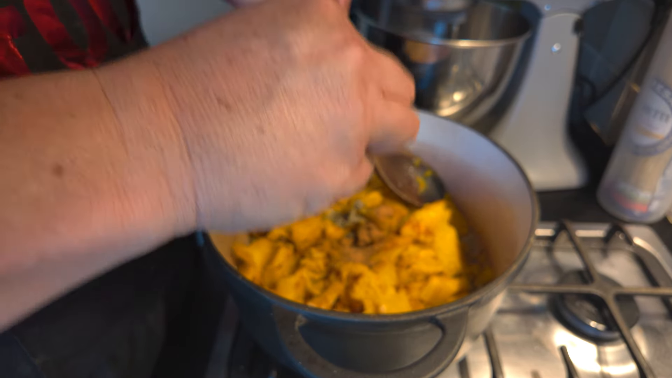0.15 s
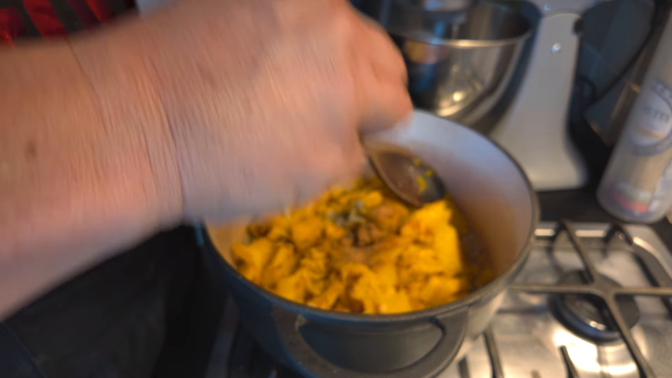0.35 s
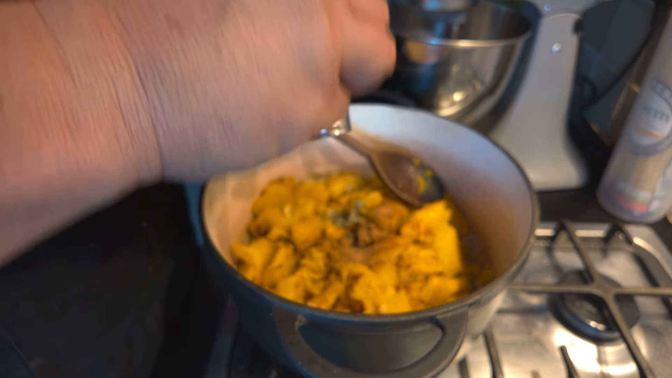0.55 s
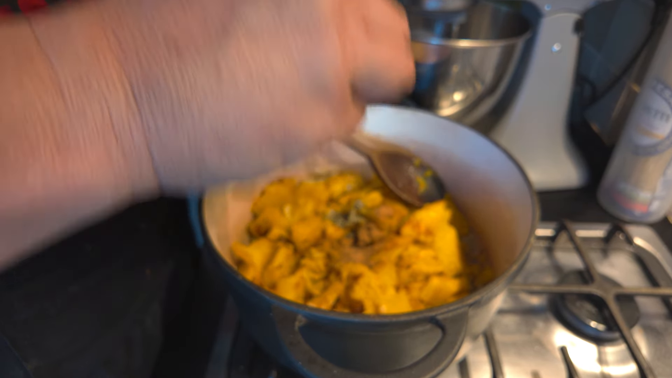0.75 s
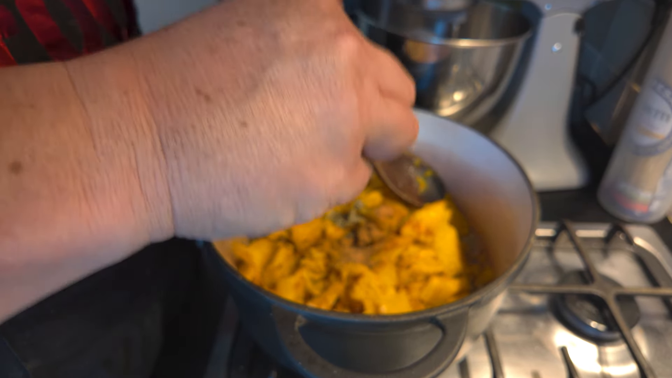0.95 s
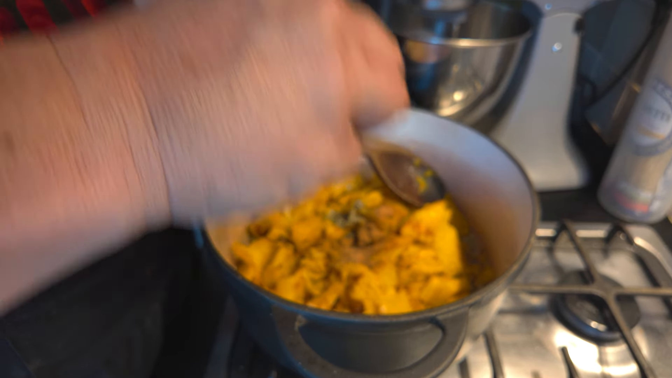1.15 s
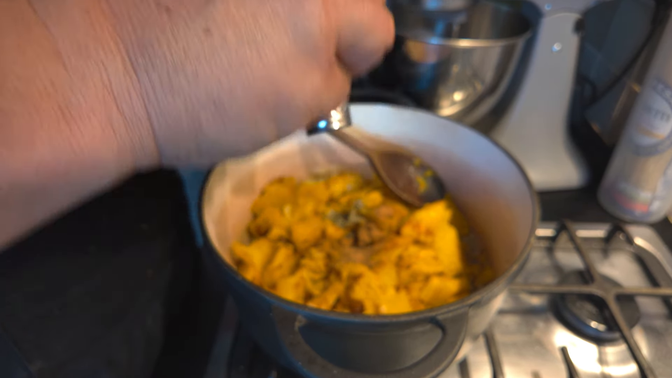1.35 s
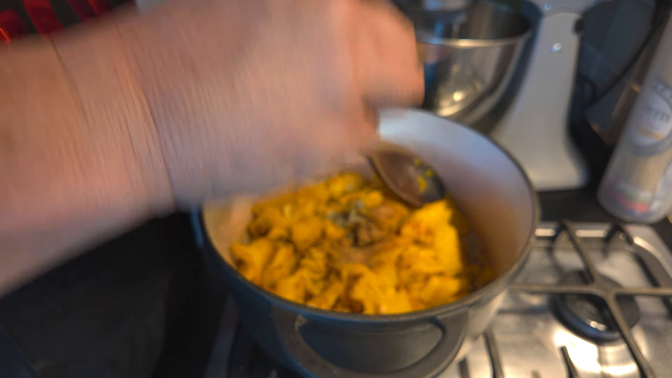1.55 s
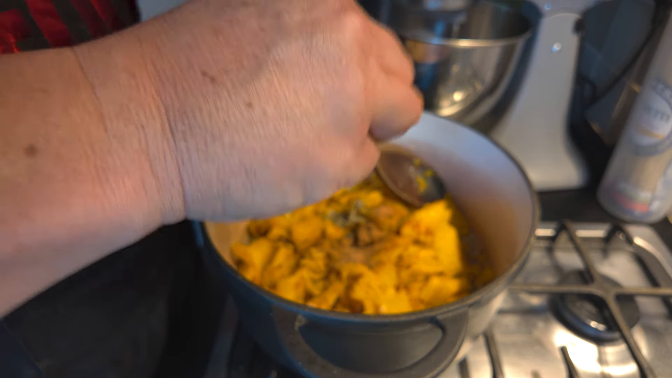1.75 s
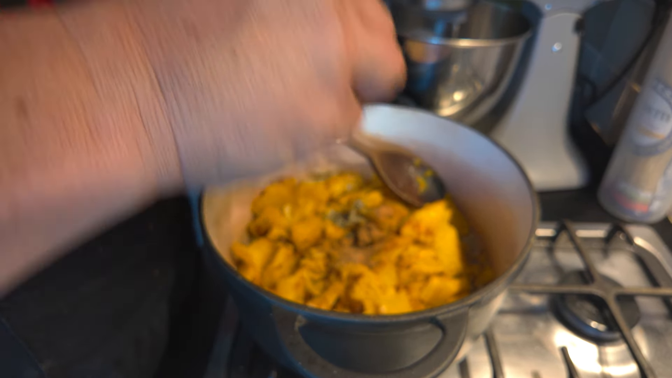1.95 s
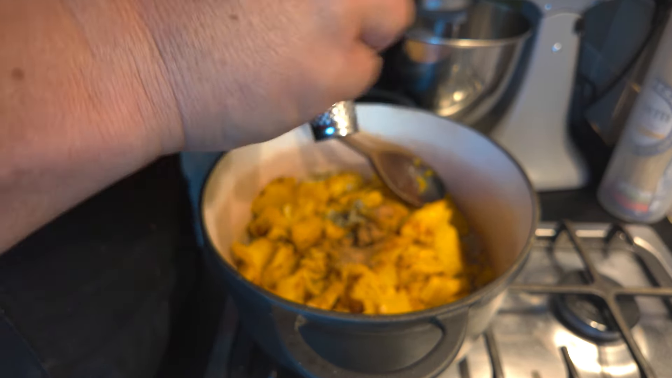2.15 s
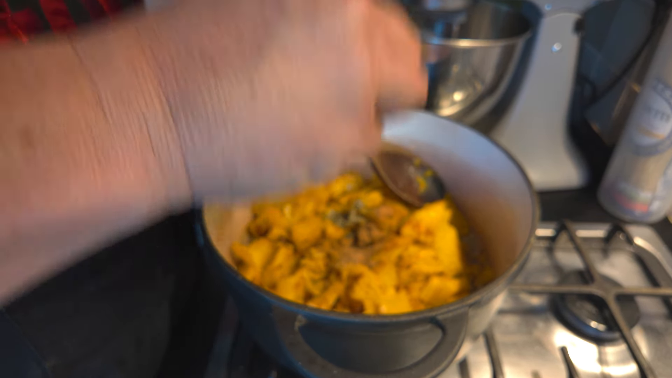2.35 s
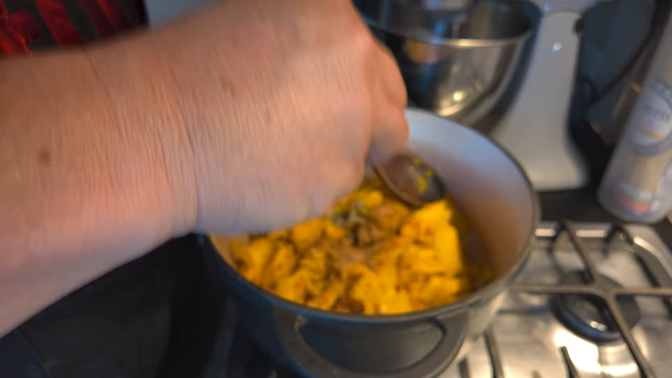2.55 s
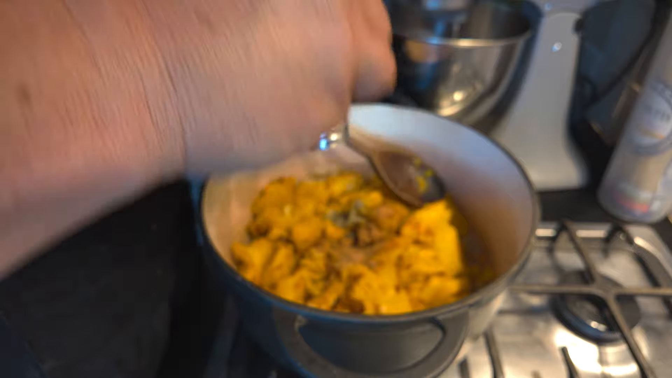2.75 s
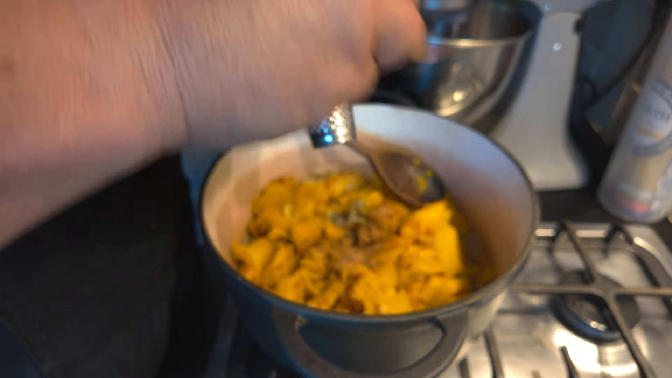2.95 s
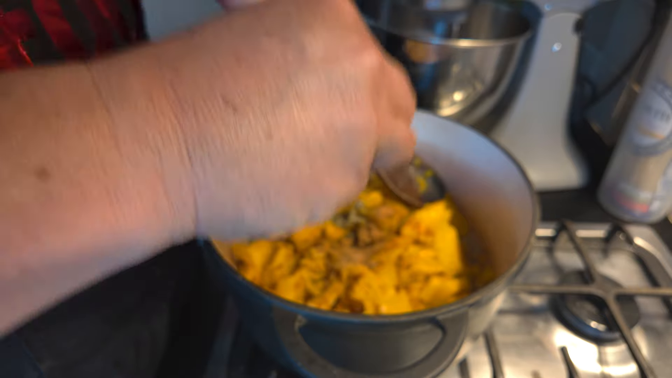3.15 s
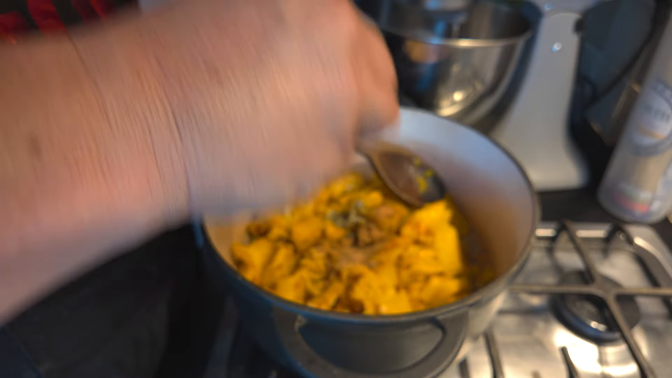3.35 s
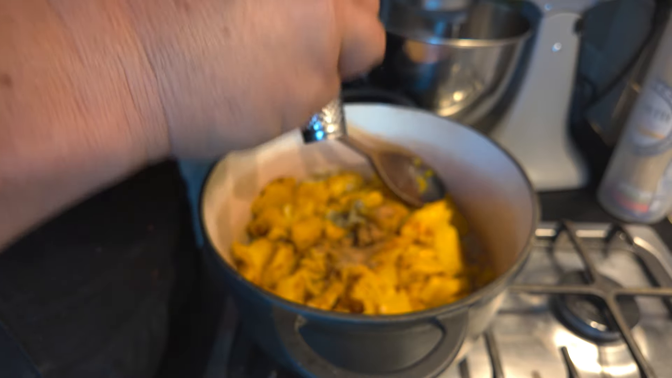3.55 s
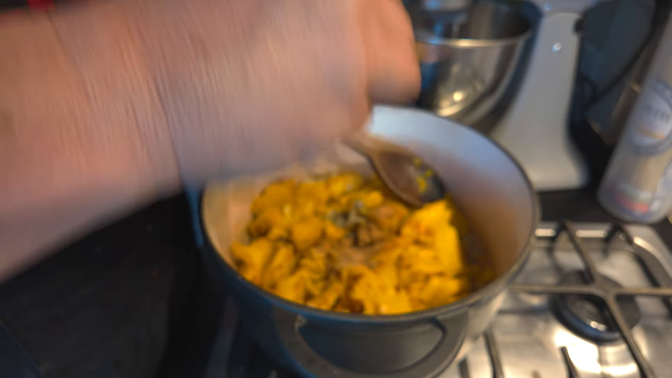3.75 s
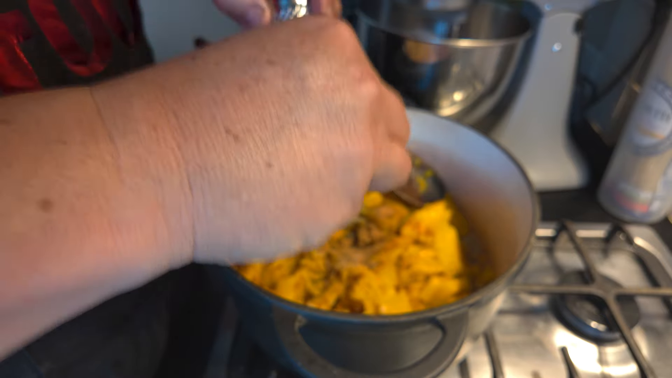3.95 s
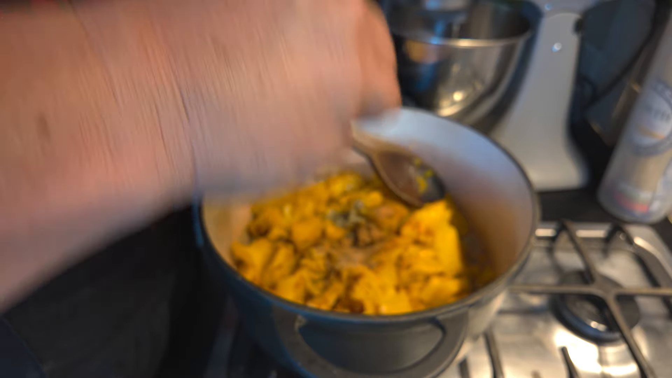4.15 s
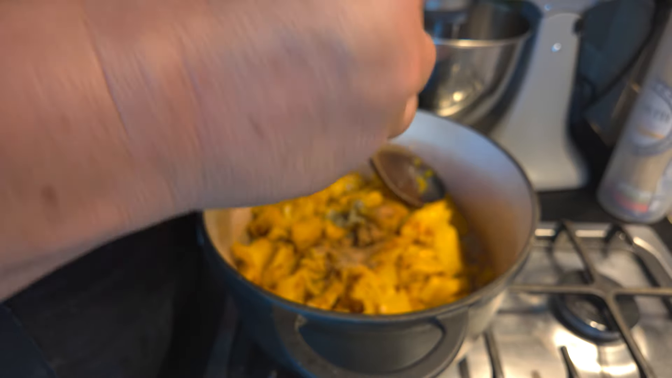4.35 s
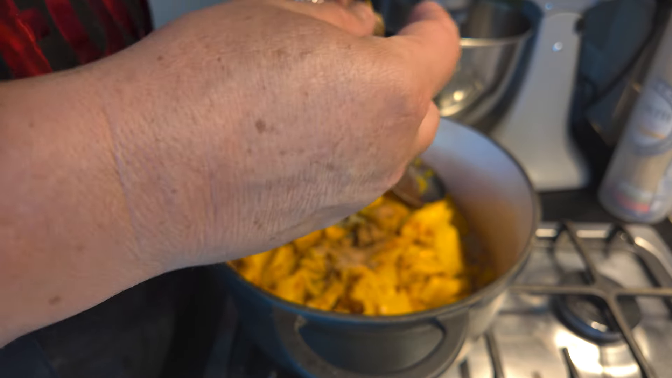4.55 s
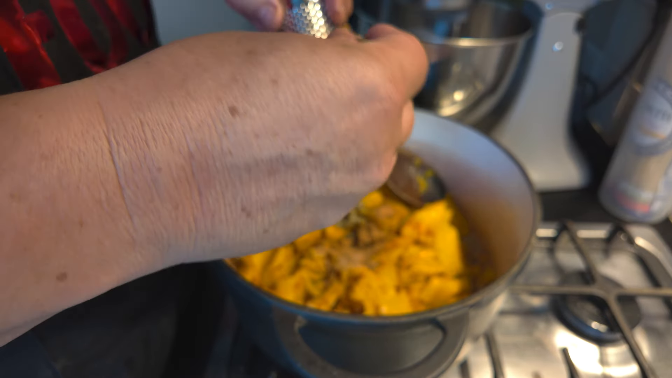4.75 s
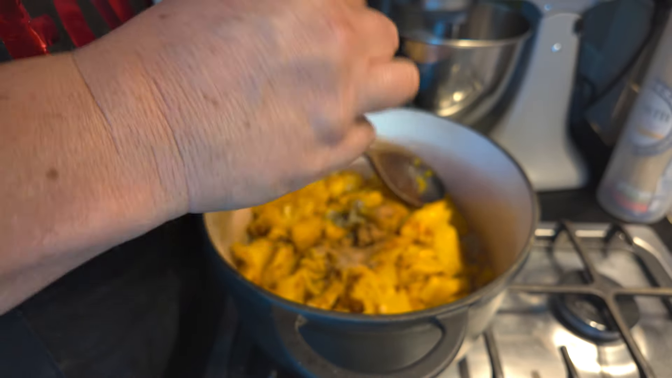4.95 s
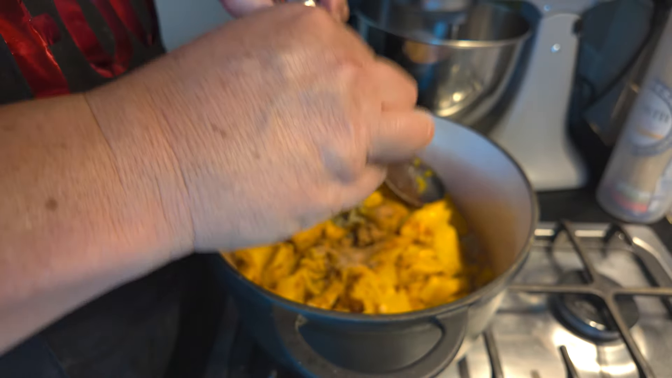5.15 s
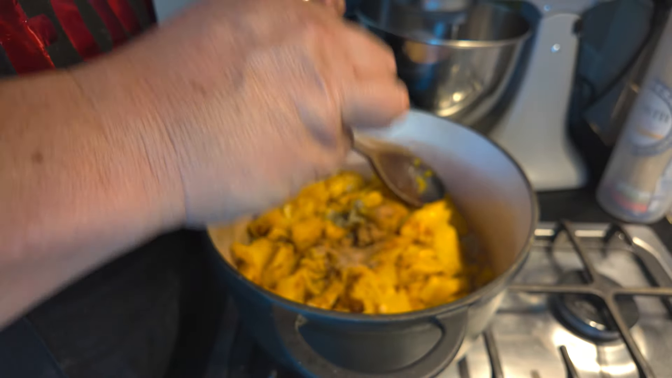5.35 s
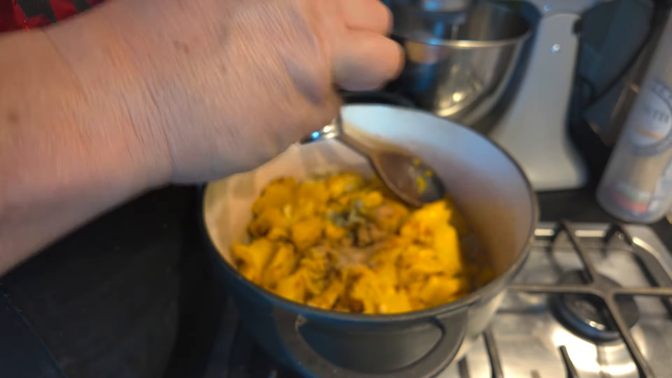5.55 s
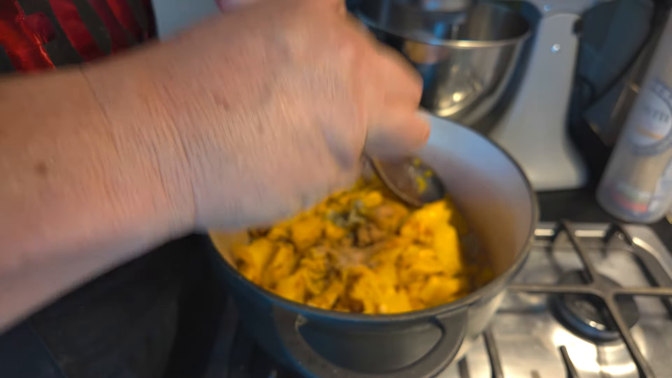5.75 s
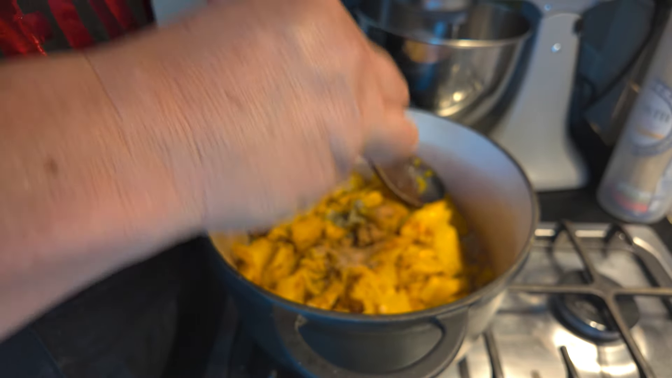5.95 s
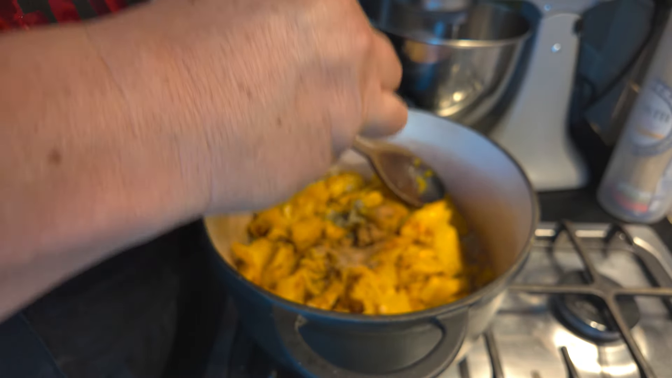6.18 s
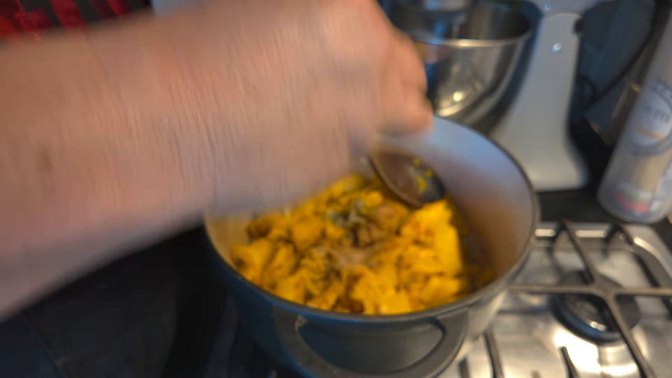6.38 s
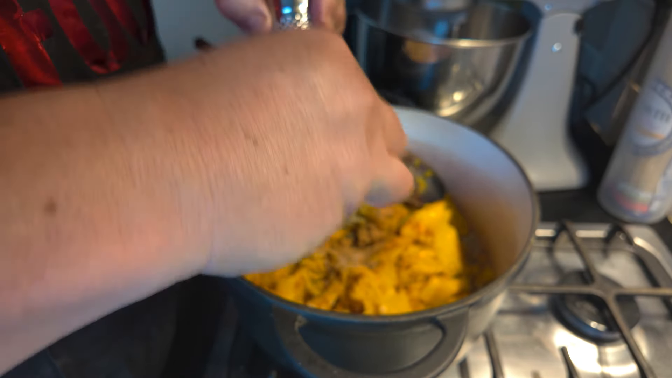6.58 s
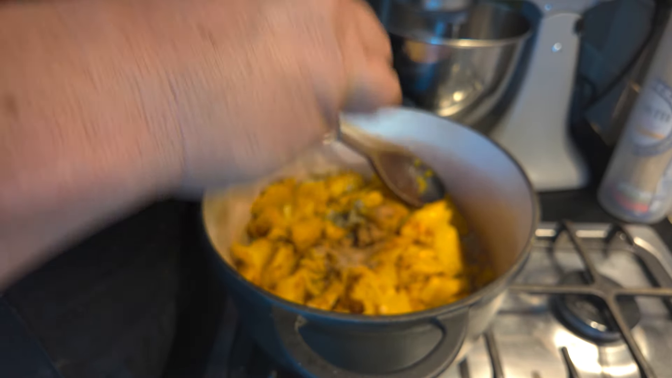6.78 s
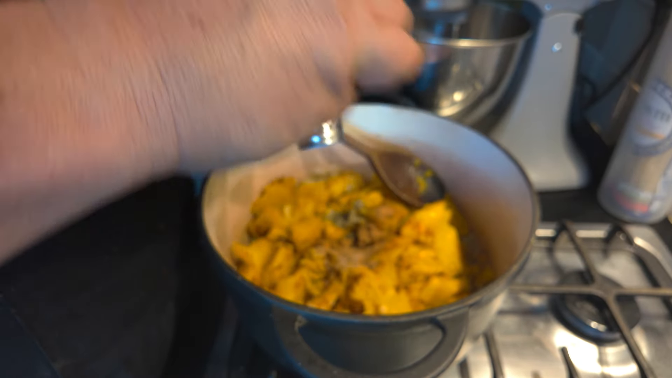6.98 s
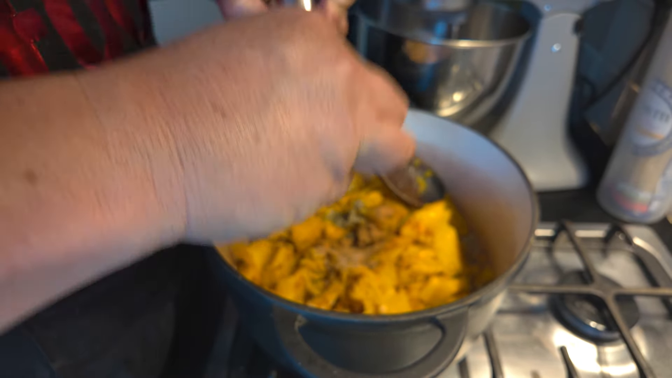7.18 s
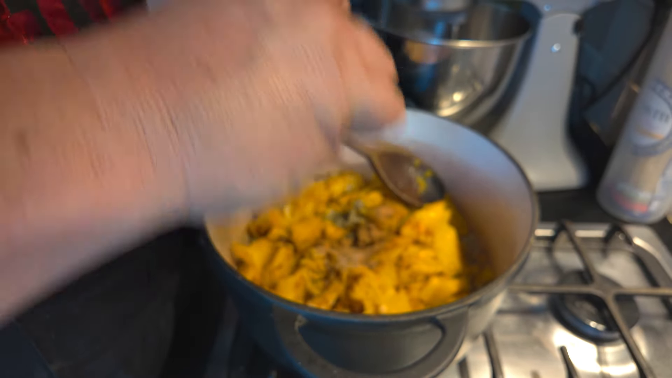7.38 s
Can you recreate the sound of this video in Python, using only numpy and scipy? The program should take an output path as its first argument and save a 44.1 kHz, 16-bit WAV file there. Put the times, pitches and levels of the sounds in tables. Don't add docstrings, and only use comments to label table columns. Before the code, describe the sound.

Quick, regular grating, almost four strokes a second: hard nut knocks the hand-held metal plate, then teeth bite with a coarse, crackling rasp. A steady appliance murmur lies beneath. Midway the hand stops, cloth rustles faintly and a knuckle bumps softly; then strokes return with softer taps at first and more steel singing, growing firmer. Close, mono-like pickup in a small, lightly reverberant kitchen.

```python
import sys
import numpy as np
from scipy import signal
from scipy.fft import rfft, irfft, next_fast_len
from scipy.io import wavfile
from scipy.ndimage import uniform_filter1d, map_coordinates

SR = 44100
rng = np.random.default_rng(int(sys.argv[2]) if len(sys.argv) > 2 else 0)


def wav_record(signal):
    frames = np.transpose(np.atleast_2d(signal))
    bounded = np.clip(frames, -1, 1)
    quanta = np.round(bounded * 32767).astype(np.int16)
    wavfile.write(sys.argv[1], SR, quanta)


def how_loud(loudness_db):
    steps = np.asarray(loudness_db, float) / 20
    return 10 ** steps


N = 327222
T = np.arange(N) / SR

# frequency in Hz, level in dB per Hz.
AIR = [(18, -42), (30, -11), (48, -24), (59, -8), (238, -7), (435, -10.5), (471, -8.5), (551, -11),
       (628, -12.5), (1030, -6.5), (2100, -14), (2520, -10.5), (5540, -17.5), (15800, -42.5)]
# frequency in Hz, width in Hz, level in dB.
HUM = [(530.6, 2.8, -66)]
# frequency in Hz, time to fall by 60 dB in seconds.
KITCHEN = [(150, 0.53), (600, 0.49), (1500, 0.33), (2300, 0.47), (3200, 0.36), (6000, 0.37), (12000, 0.3),
           (15500, 0.14)]
# start in seconds, peak in dB, slide and steel ring in dB relative to the peak.
TAPS = [(0.084, -14, -19, -45), (0.351, -24, -13.5, -43), (0.607, -19.5, -18.5, -60),
        (0.893, -17, -20.5, -50), (1.157, -15.5, -19.5, -42), (1.424, -20, -19.5, -40),
        (1.714, -19.5, -20, -33), (1.976, -15.5, -17, -27.5), (2.257, -18, -15.5, -28.5),
        (2.525, -17, -15.5, -30.5), (2.797, -10, -20, -28), (3.082, -8.5, -18, -35),
        (3.367, -13, -19, -30.5), (3.628, -19, -15.5, -22), (3.899, -15.5, -18, -34),
        (4.172, -22, -10.5, -22), (5.04, -26, -20.5, -44), (5.071, -48, -26, -36), (5.081, -32, -30, -44),
        (5.356, -25.5, -12, -27), (5.652, -27.5, -9, -18.5), (5.939, -28.5, -10.5, -12),
        (6.245, -27, -15.5, -19), (6.253, -38.5, -3, -22), (6.53, -18.5, -17, -31),
        (6.568, -26.5, -14.5, -55), (6.824, -16.5, -17.5, -24.5), (7.11, -13.5, -19, -33),
        (7.399, -16, -16.5, -30)]
# frequency in Hz, width in Hz, level in dB.
KNOCK = [(871, 31, 10.5), (1070, 12, 4), (1490, 108, 12), (2384, 250, 3), (1710, 2740, 0), (2700, 190, 9),
         (5130, 160, -44), (7000, 190, 6)]
# frequency in Hz, wander of the pitch in Hz.
RINGS = [(3112, 14), (4085, 13), (7020, 48), (11530, 38), (14650, 40)]
RUBBED_DB = [-13.5, -13.5, -17, -21.5, -36]
TAPPED_DB = [2.5, -3.5, -1, -12.5, -27]
GRIP_FREES_DB = [-3, 6, 1.5, 4, 4]
# time in seconds, grip from low -1 to high 1, nearness of the pot in dB.
HAND = [(0.1, -0.66, -15), (1.0, -0.87, -15), (1.8, 1, -18), (2.5, -0.45, -18), (3.2, 0.086, -18),
        (3.8, 0.51, -17.5), (4.05, 0.42, -18), (4.27, -0.067, -14), (5.1, -0.06, -47), (5.5, 1, -33),
        (6.1, .5, -19), (6.6, 1, -24), (6.92, 0.65, -20), (7.3, .6, -27)]
# frequency in Hz, width in Hz, level in dB.
BOWL = [(1005, 20, -3), (2165, 16, -1), (2225, 18, 0), (2455, 18, 0), (2515, 18, -2)]
# start in seconds, peak in dB, rise to the peak in seconds,
# length in seconds, level at entry in dB relative to the peak.
STROKES = [(0.129, -23.5, 0.014, 0.062, -3.5), (0.394, -19.5, 0.036, 0.07, -4),
           (0.667, -23, 0.028, 0.064, -0.5), (0.937, -22.5, 0.048, 0.077, -4.5),
           (1.199, -23.5, 0.05, 0.09, -4.5), (1.469, -23.5, 0.017, 0.12, -6),
           (1.755, -23.5, 0.043, 0.065, -4.5), (2.016, -23, 0.07, 0.096, -3.5),
           (2.3, -22.5, 0.063, 0.057, -2.2), (2.565, -27, 0.091, 0.099, 0.5),
           (2.834, -22.5, 0.029, 0.089, -19), (3.134, -19, 0.012, 0.061, -5.5),
           (3.402, -23.5, 0.073, 0.079, 2.7), (3.668, -19.5, 0.041, 0.078, -7),
           (3.941, -23.1, 0.057, 0.092, -1), (4.221, -19.5, 0.041, 0.069, -4.5),
           (5.115, -20.5, 0.06, 0.095, -9), (5.407, -19, 0.045, 0.094, -9.5),
           (5.713, -20, 0.048, 0.062, -6), (5.971, -31, 0.028, 0.13, -9), (6.302, -21, 0.022, 0.075, -13),
           (6.602, -21, 0.02, 0.066, 1.5), (6.865, -16, 0.044, 0.073, -11.5),
           (7.168, -22, 0.029, 0.073, -4.5)]
# start in seconds, bite in dB, reach to the upper plate in dB,
# sharpness of the teeth met in dB, singing of the steel in dB.
BITES = [(0.138, -26, 4.5, 2, -4), (0.396, -10.5, 2, -1, -2), (0.668, -22, -0.5, 0.5, -7),
         (0.947, -19, 0.5, 0.5, -1), (1.211, -18, 2, -0.5, -10), (1.472, -24, -1.5, -0.5, -0.5),
         (1.767, -30, 0, -2.5, -6), (2.025, -29, -0.5, -2, -2), (2.304, -26, 2, 1, 2),
         (2.574, -24, 0.5, 0, -2), (2.856, -25, 2, 4.5, -4), (3.141, -27, -1, 1, -3), (3.403, -15, 2, 1, 2),
         (3.677, -16, -0.5, 0.5, -1), (3.947, -12, -2, 2.5, -4), (4.225, -5.5, -5, 5.5, 4.5),
         (5.112, -18, -0.5, -4.5, 5.5), (5.41, -19, 0, -2.5, 3.5), (5.723, -33, 1, -3, 3),
         (5.981, -22, -1, -1, 4), (6.31, -10.5, -5, -0.5, 4.5), (6.599, -10.5, -1, -3, 2),
         (6.87, -15.5, 1.5, -2, 1), (7.169, -37, 0, 1.5, 1)]
# frequency in Hz, width in Hz, level in dB.
PLATE = [(556.5, 30, -7), (757, 47, -1.5), (866, 34, 3), (1037.5, 128, 1), (1402, 86, 0.5), (1554, 95, 1),
         (1962, 184, 3.5), (2223, 400, -1)]
# frequency in Hz, width in Hz, level in dB.
UPPER = [(2412, 61, 7.5), (2651, 73, 8.5)]
# frequency in Hz, level in dB per Hz.
TEETH = [(1710, -10), (2900, -1), (3160, -9.5), (3350, -4.5), (4150, -6.5), (4330, -13.5), (5100, 0.5),
         (6010, -9), (6930, -7), (8230, -13.5), (11400, -16), (14200, -26.5), (16000, -43)]
# frequency in Hz, width in Hz, level in dB.
POT = [(104, 14, -7), (165, 116, -1.5), (334, 78, 0)]
# time in seconds, level in dB, frequency in Hz.
GRIP = [(2.228, -52, 6000), (4.405, -47, 5500), (4.488, -66, 3000), (4.553, -58, 5500), (4.733, -56, 7000),
        (4.808, -50, 3500), (4.89, -51, 5400), (5.073, -52, 10000), (5.088, -61, 9000), (5.623, -52, 11000),
        (6.001, -31, 1900), (6.09, -30, 2190), (6.14, -53, 7000), (6.18, -62, 12000), (6.611, -24, 1500),
        (6.833, -19, 1450), (7.153, -35, 2700)]
# time in seconds, level in dB, frequency in Hz.
BUMP = (4.975, -36.5, 250)
# time in seconds, level in dB.
SLEEVE = [
    (4.36, -55),
    (4.394, -59),
    (4.512, -51),
    (4.614, -72),
    (4.924, -73),
    (4.95, -72),
]
# frequency in Hz, level in dB per Hz.
CLOTH = [(80, -31), (150, 0), (500, -4), (1000, -11), (2000, -20), (4000, -48)]
# lowest frequency of the near objects, highest frequency the microphone hears, in Hz.
MIC_HZ = (111, 15550)


def unit(x):
    return x / np.sqrt(np.mean(x ** 2) + 1e-20)


def along(points, hz):
    f, v = np.transpose(points)
    return np.interp(np.log(hz + 1), np.log(f + 1), v)


def wobble(rate):
    return map_coordinates(rng.standard_normal(int(N * rate / SR) + 4), [T * rate])


def filtered(x, response):
    m = next_fast_len(N + SR // 4)
    h = response(np.fft.rfftfreq(m, 1 / SR))
    h = h / np.sqrt(np.mean(np.abs(h) ** 2))
    return irfft(rfft(x, m) * h, m)[:N]


def modes(rows):
    def response(f):
        total = 0
        for k, (hz, width, db) in enumerate(rows):
            drag = 1j * f * width
            total = total + (-1) ** k * how_loud(db) * drag / (hz * hz - f * f + drag)
        return total
    return response


def colour(points):
    return lambda f: how_loud(along(points, f))


def grains(rate, spread_db, dust):
    when, side, size = rng.random((3, N))
    size_db = np.minimum(-spread_db * np.log(size), 3 * spread_db)
    tears = (when < rate / SR) * np.sign(side - .5) * how_loud(size_db)
    return unit(unit(tears) + dust * rng.standard_normal(N))


def patchy(x, depth_db):
    z = signal.stft(x, nperseg=256)[2]
    field = uniform_filter1d(rng.standard_normal(z.shape), size=4, axis=0)
    field = uniform_filter1d(field, size=6, axis=1)
    return unit(signal.istft(z * how_loud(depth_db * unit(field)), nperseg=256)[1][:N])


def air():
    noise = rng.standard_normal((2, N))
    bed_db = -55.5 + .6 * wobble(3) + .6 * wobble(15)
    bed = how_loud(bed_db) * filtered(patchy(noise[0], depth_db=1.6), colour(AIR))
    (hz, width, db), = HUM
    return bed + how_loud(db + 0.84 * wobble(8)) * filtered(noise[1], modes([(hz, width, 0)]))


def earlier_stroke():
    out = np.zeros(N)
    out[:900] = how_loud(-37.5) * filtered(rng.standard_normal(N), modes(PLATE + UPPER))[:900]
    return out


def kitchen(x, wet_db):
    out, step = np.zeros(N + 2 * SR), round(.28 * SR)
    for i in range(0, N, step):
        hz, t, z = signal.stft(rng.standard_normal(SR // 2), SR, nperseg=256)
        decay = how_loud(-60 * t / along(KITCHEN, hz)[:, None])
        tail = signal.istft(z * decay, SR, nperseg=256)[1]
        wet = signal.fftconvolve(x[i:i + step], tail / np.linalg.norm(tail))
        out[i + 130:][:len(wet)] += wet
    return how_loud(wet_db) * out[:N]


def hand():
    s, place, pot_db = np.transpose(HAND)
    return np.outer(GRIP_FREES_DB, np.interp(T, s, place)), np.interp(T, s, pot_db)


def taps():
    blows, slide, skim = np.zeros((3, N))
    ring = np.zeros((len(RINGS), N))
    starts = np.array([row[0] for row in STROKES] + [N / SR])
    rebound_s = .0011 * how_loud(.6 * rng.standard_normal(len(TAPS)))
    for (s, db, slide_db, ring_db), hop in zip(TAPS, rebound_s):
        blows[round(s * SR) + 15] -= how_loud(db + 10.0)
        blows[round((s + hop) * SR) + 15] -= how_loud(db + 8.5)
        next_stroke = starts[starts > s][0]
        on = (T >= s) & (T < min(next_stroke + .005, s + .07))
        t = T[on] - s
        lasting = how_loud(.5 * (slide_db + 15))
        slide[on] += how_loud(db + slide_db - 60 * t / (0.081 * lasting))
        skim[on] += how_loud(db + slide_db - 60 * t / (0.11 * lasting)) * (1 - np.exp(-t / 0.0048))
        swell = np.sin(np.pi * np.clip((t / max(t[-1], .045)) ** 0.5, 0, 1))
        ring[:, on] += how_loud(db + ring_db + np.array(TAPPED_DB)[:, None]) * swell
    for s, db, *_ in BITES:
        blows[round(s * SR)] -= how_loud(db + 4.0)
    soft = filtered(blows, lambda f: 1 / (1 + 1j * f / 3000) ** 2)
    rub = grains(rate=1200, spread_db=5.5, dust=1.0)
    hiss = how_loud(3.0) * filtered(skim * patchy(rub, depth_db=1.5), colour(TEETH))
    knock = filtered(how_loud(-5) * soft + slide * rub, modes(KNOCK))
    return knock + hiss, ring * how_loud(hand()[0])


def steel(strengths):
    ring_t60_s, flutter_db = .045, 2.6
    out, keep = np.zeros(N), how_loud(-60 / (ring_t60_s * SR))
    for strength, (hz, wander_hz) in zip(strengths, RINGS):
        turns = np.cumsum(hz + wander_hz * wobble(130)) / SR
        flutter = how_loud(flutter_db * (wander_hz / 14) ** .55 * wobble(110))
        tone = unit(flutter * np.sin(2 * np.pi * turns))
        out += signal.lfilter([1 - keep], [1, -keep], strength) * tone
    return out


def bowl(x):
    shades = unit(how_loud(3 * np.array([wobble(4) for _ in BOWL])))
    out = np.zeros(N)
    for shade, (hz, width, db) in zip(shades, BOWL):
        out += how_loud(db - 25.5) * filtered(x * shade, modes([(hz, width, 0)]))
    return out


def rows_of_teeth(share):
    rows_per_s, uneven, scatter_db, dies_s = 108, .12, 2.5, .0025
    bites = np.array([row[0] for row in BITES])
    passed = np.cumsum(rows_per_s * (1 + uneven * wobble(60))) / SR
    last = np.searchsorted(bites, T) - 1
    passed -= passed[np.round(bites * SR).astype(int)][last]
    sizes = how_loud(scatter_db * rng.standard_normal((len(BITES), 1000)))
    size = sizes[last, passed.astype(int) % 1000]
    catch = size * np.exp(-(passed % 1) / (rows_per_s * dies_s))
    drag = how_loud(1.2 * wobble(220) + .6 * wobble(45))
    return [unit(drag * (1 + g * catch)) for g in share]


def strokes():
    attack_s, attack_db = 0.0067, -10
    sag_db, lift_db_per_s = -5.5, -450
    upper_db_per_s, teeth_db_per_s, pot_db_per_s = -39, -51, -100
    db = np.full((4, N), -120.0)
    sing_db, (grip_db, pot_db) = np.zeros(N), hand()
    for (s, peak_db, rise, length, entry_db), (_, _, reach_db, sharp_db, song_db) in zip(STROKES, BITES):
        on = (T >= s) & (T < s + length + .1)
        t = T[on] - s
        rise = max(rise, 2 * attack_s)
        length = max(length, rise + attack_s)
        shape_db = [entry_db + attack_db, entry_db, 0, sag_db]
        press = peak_db - 6 + np.interp(t, [0, attack_s, rise, length], shape_db)
        press += lift_db_per_s * np.maximum(t - length, 0)
        sing_db[on] = song_db
        travel = np.minimum(t, length) - length / 2
        sink_db = -8.5 * np.exp(-t / 0.0046)
        db[0, on] = press
        db[1, on] = press + reach_db + upper_db_per_s * travel
        db[2, on] = press - 2 + sharp_db + teeth_db_per_s * t.clip(0, length) + sink_db
        db[3, on] = press + pot_db[on] + pot_db_per_s * travel
    ring = how_loud(db[2] + sing_db + grip_db + np.array(RUBBED_DB)[:, None])
    plate, upper, teeth, pot = how_loud(db) * rows_of_teeth(2.6 * np.array([1, 1, .35, .5]))
    tear = grains(rate=2000, spread_db=3.2, dust=1.1)
    fine = patchy(grains(rate=2600, spread_db=4, dust=1) + .6 * tear, depth_db=2.4)
    body = how_loud(-1.0) * filtered(plate * tear, modes(PLATE))
    body += how_loud(-4.0) * filtered(upper * tear, modes(UPPER))
    body += how_loud(-0.45) * filtered(teeth * fine, colour(TEETH))
    body += filtered(pot * tear, modes(POT))
    return body, ring


def grip():
    out, t = np.zeros(N), np.arange(SR // 20) / SR
    for s, db, hz in GRIP:
        b, a = signal.butter(2, [hz / 1.6, hz * 1.6], "bandpass", fs=SR)
        noise = unit(signal.lfilter(b, a, rng.standard_normal(len(t))))
        puff = noise * how_loud(db - 60 * t / 0.026) * (1 - np.exp(-t / 0.00078))
        out[round(s * SR):][:len(t)] += puff
    s, db, hz = BUMP
    push = how_loud(-60 * t / 0.015) * (1 - np.exp(-t / 0.00085))
    thud = np.sin(2 * np.pi * hz * t) + 2.2 * np.sin(2 * np.pi * hz * t / 3)
    out[round(s * SR):][:len(t)] -= how_loud(db + 7) * push * thud
    return out


def sleeve():
    s, db = np.transpose(SLEEVE)
    level = how_loud(np.interp(T, s, db - 5, left=-120, right=-120) + 2.6 * wobble(30))
    rustle = patchy(grains(rate=500, spread_db=3, dust=1.2), depth_db=0.5)
    return filtered(level * rustle, colour(CLOTH))


def scene():
    knock, knock_ring = taps()
    rasp, rasp_ring = strokes()
    hands = knock + rasp + grip() + sleeve()
    hands += bowl(hands) + steel(rasp_ring + knock_ring)
    near = hands + kitchen(hands + earlier_stroke(), wet_db=-13.5)
    no_bass = signal.butter(2, MIC_HZ[0], "highpass", fs=SR, output="sos")
    near = signal.sosfilt(no_bass, near)
    return np.tile(near + air(), (2, 1))


def top_cut(x):
    return signal.sosfilt(signal.butter(12, 16480, fs=SR, output="sos"), x)


def record(dry):
    m = next_fast_len(N)
    band = np.clip((MIC_HZ[1] + 400 - np.fft.rfftfreq(m, 1 / SR)) / 400, 0, 1) ** 2
    mix = irfft(rfft(dry, m) * band, m)[:, :N]
    return top_cut(mix)


dry = scene()
out = record(dry)
wav_record(out)
```